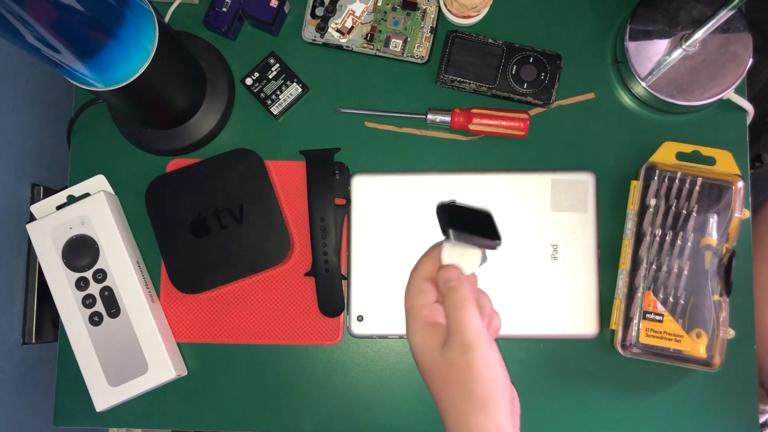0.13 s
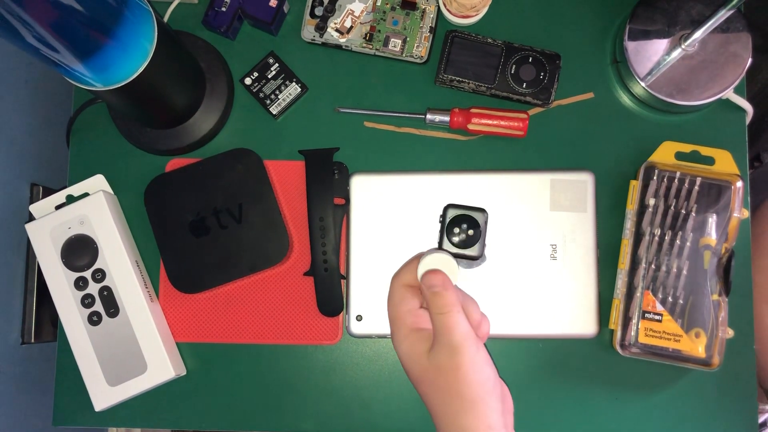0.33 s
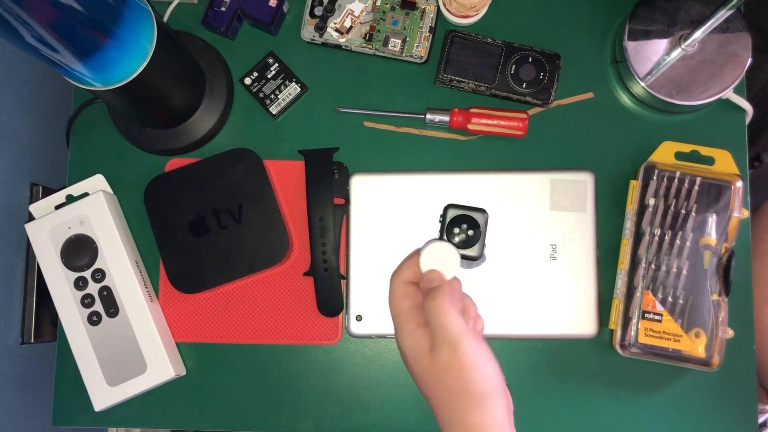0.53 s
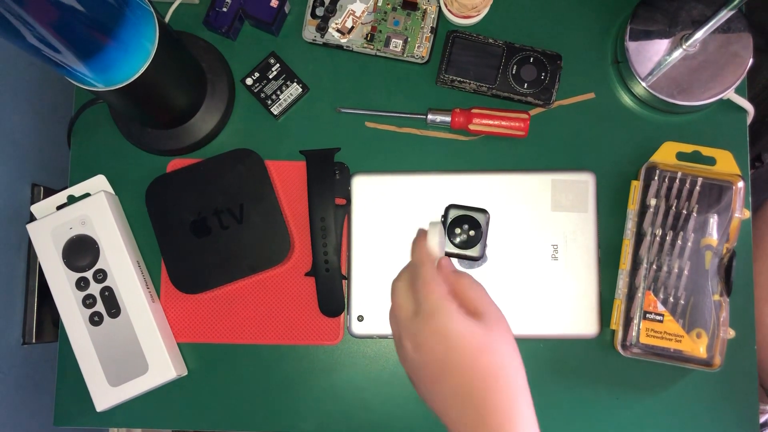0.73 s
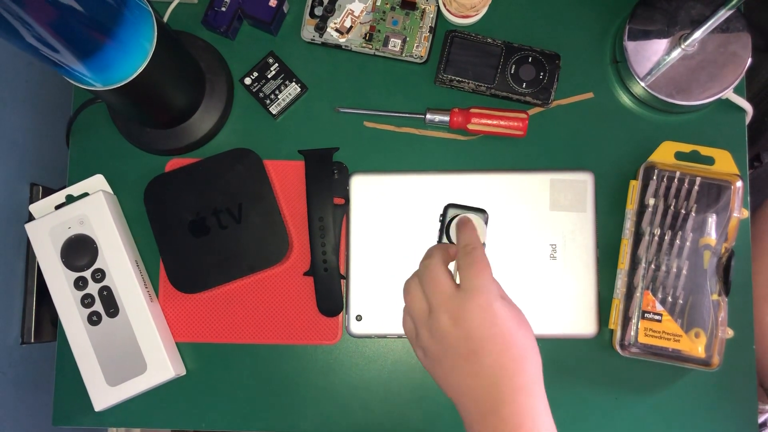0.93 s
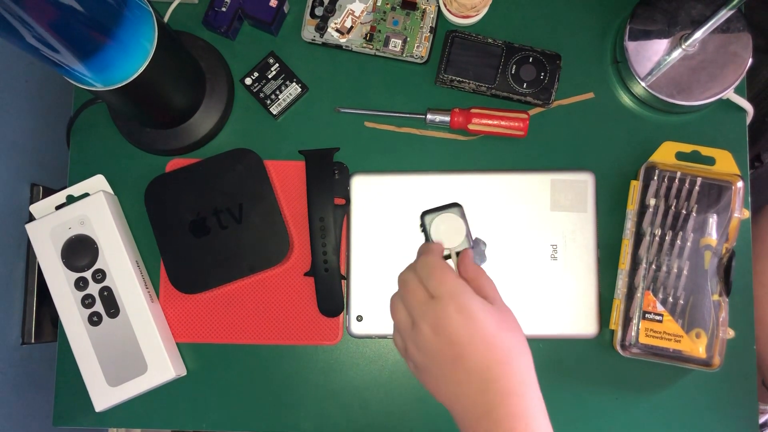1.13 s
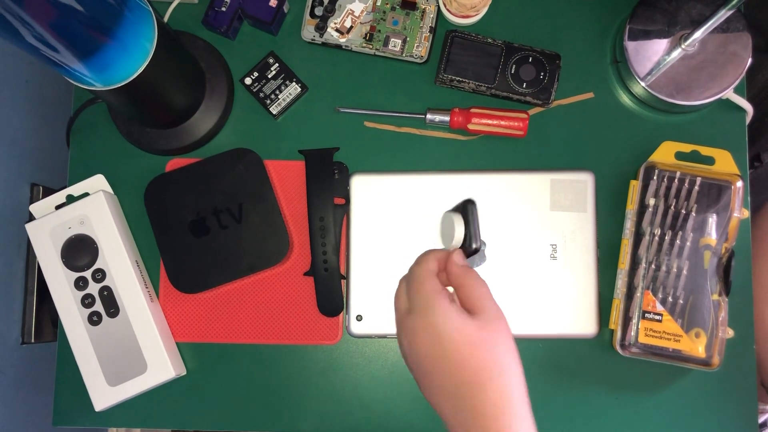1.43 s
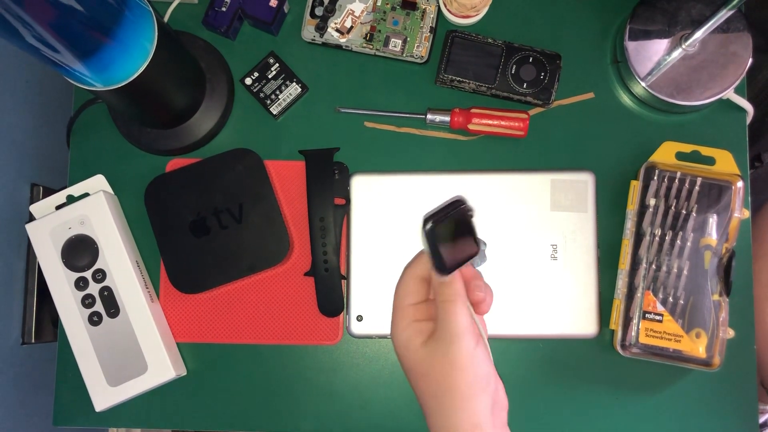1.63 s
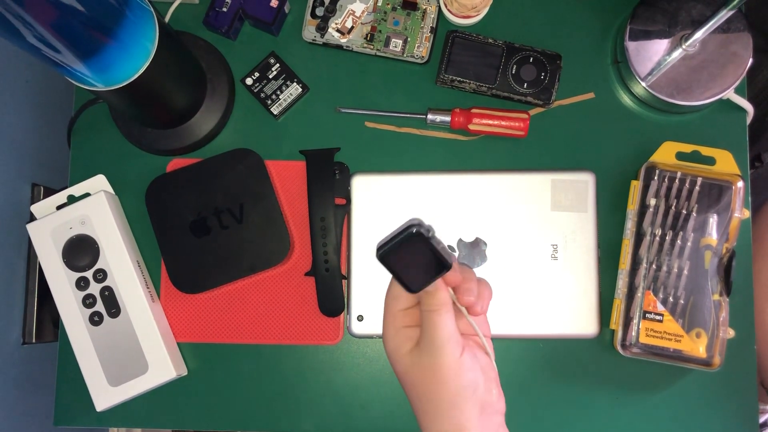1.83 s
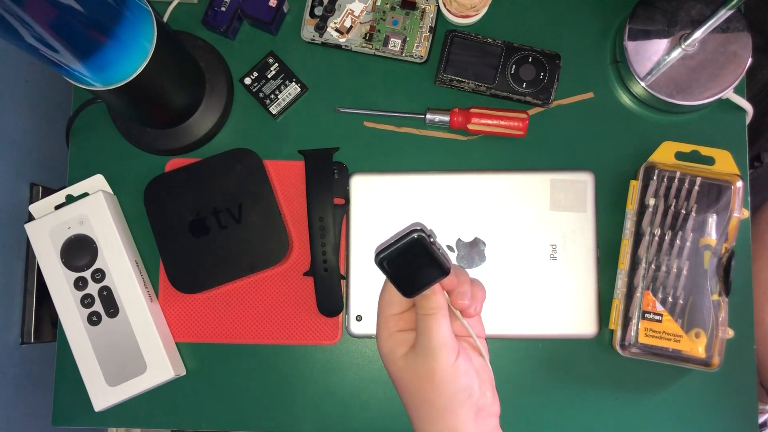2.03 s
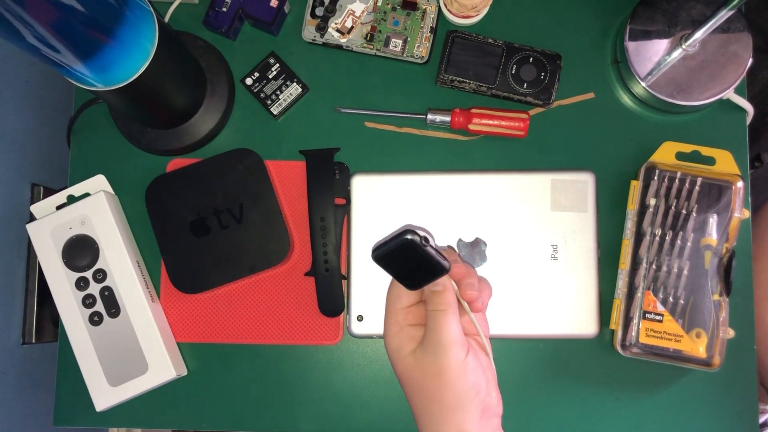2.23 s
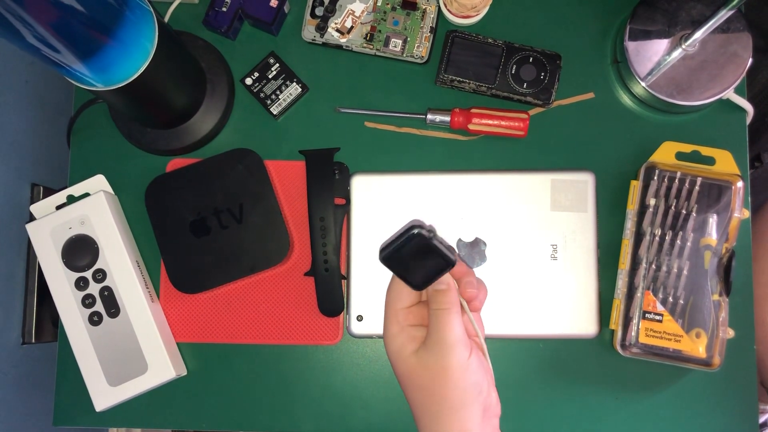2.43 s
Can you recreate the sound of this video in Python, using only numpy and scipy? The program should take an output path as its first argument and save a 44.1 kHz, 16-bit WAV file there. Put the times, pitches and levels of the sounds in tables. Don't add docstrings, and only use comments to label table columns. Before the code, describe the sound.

A small watch case clacks onto a thin slab on a desk: a loud, sharp edge hit at 0.22 seconds, a tiny bounce, then a flat slap at 0.30 with a short woody, rattly ring. After quiet hiss, a magnetic puck touches faintly at 0.85 and snaps on softly at 0.93. Very faint finger ticks follow at 1.1, and a light scrape at 1.27. Close microphone, small furnished room.

```python
import sys
import numpy as np
from scipy import signal
from scipy.fft import rfft, irfft
from scipy.io import wavfile

SR = 44100
rng = np.random.default_rng(int(sys.argv[2]) if len(sys.argv) > 2 else 0)


def volts_from_decibels(level):
    exponent = np.asarray(level, float) / 20
    return 10 ** exponent


def waveform_to_disk(signal):
    frames = np.transpose(np.atleast_2d(signal))
    scaled = np.clip(frames, -1, 1) * 32767
    samples = np.round(scaled).astype(np.int16)
    wavfile.write(sys.argv[1], SR, samples)


N = 114660
T = np.arange(N) / SR
LN1000 = np.log(1000)

# (frequency [Hz], level [dB per Hz])
HISS_SPECTRUM = [(6, -6.5), (16, 2), (40, -11), (70, -12.5), (200, -14), (600, -18.5), (4000, -26),
                 (15800, -29.5)]
HISS_DB = -69.5
MIC_LOW_HZ, TOP_HZ = 110.1, 15700

# (centre frequency [Hz], level [dB])
ROOM_BANDS = [(200, -17), (500, -18), (1200, -12.5), (3000, -15.5), (6000, -11.5), (9500, -10),
              (13500, -15)]
ROOM_BAND_T60 = [.22, .2, .2, .2, .19, .17, .16]
ROOM_BUILD_S = 0.01105
CLUTTER_DB, CLUTTER_T60_S = -9, 0.022
WALL_S, WALL_DB, WALL_SMEAR_S = 0.0075, -13.5, 0.01173
SCATTER_LOW_HZ = 1270

# (frequency [Hz], level [dB])
SCRAPE_SPECTRUM = [(800, 2.5), (2600, 1.5), (3400, 2.5), (4150, 1), (5200, 0), (6000, 2.5), (9000, -8.5),
                   (15000, -14)]
SCRAPE_S, SCRAPE_PEAK_S, SCRAPE_END_S, SCRAPE_DB = 1.268, 1.275, 1.308, -54

# (time [s], level [dB], push length [s])
EDGE_PUSHES = [
    (.2176, -23.5, 0.00027),
    (.2465, -31.5, 0.0005),
]
FLAT_PUSHES = [
    (.3003, -28, 0.00037),
    (.3245, -36, 0.00058),
]
TOUCH_PUSHES = [
    (.8456, -40, 0.00043),
    (.8655, -52, 0.00048),
    (.8775, -53.5, 0.00057),
]
SNAP_PUSHES = [
    (.9322, -41.5, 0.0002),
]
FINGER_PUSHES = [
    (1.1055, -57, 0.0012),
    (1.1115, -52, 0.0013),
    (1.1160, -53, 0.0019),
    (1.1265, -71, 0.0011),
    (1.2700, -53, 0.00099),
    (1.2850, -56.5, 0.00044),
]

# (frequency [Hz], level [dB], t60 [s])
EDGE_RING = [(136.6, -9.5, 0.13), (205, -6.5, 0.0698), (273, 0, 0.11), (331, -2.5, 0.09), (454, -5, 0.082),
             (574.7, -25, 0.048), (683, -2, 0.046), (763, -4, 0.054), (937, -1, 0.043), (1105, -2, 0.032),
             (1280, -3.5, 0.031), (1550, 1, 0.019), (1846, -4, 0.02)]
FLAT_RING = [(205, -15, 0.12), (275.8, -12, 0.14), (346.2, -1.5, 0.084), (459, -4.5, 0.078),
             (596, -11.5, 0.12), (704, -13, 0.037), (756, -4.5, 0.071), (903, -10, 0.055),
             (1096, -12.5, 0.11), (1310, -8, 0.073), (1580, -27, 0.093), (2185, 1, 0.059), (3288, 14, 0.08)]
TOUCH_RING = [(124.5, -10.5, 0.11), (210, -7.5, 0.083), (272.5, -5.5, 0.06), (335, 1, 0.073),
              (434, -3.5, 0.039), (570, -3, 0.046), (696, -9, .04), (762, -5.5, 0.057), (840, -3.5, 0.027),
              (1110, -3.5, 0.016)]
SNAP_RING = [(198, -2, 0.087), (274.8, 1, 0.15), (326, 2.5, 0.045), (466, -8.5, 0.056), (556, -8, 0.04),
             (720, -2, 0.033), (770, -1.5, 0.052), (895, -1.5, 0.036), (1046, -14, 0.022),
             (1423, -6.5, 0.058)]
FINGER_RING = [(289, 0.5, 0.045), (345, -3.5, 0.042), (770, -19, 0.05), (1200, -21, .03)]
SWELL_CYCLES = 0.51

# (level [dB], t60 [s])
SLAB_RATTLE = [
    (-3.5, 0.15),
    (-4.5, 0.18),
    (-0.5, 0.061),
    (-1, 0.13),
    (-11, 0.15),
]
# (frequency [Hz], level [dB])
RATTLE_SPECTRUM = [(120, -18.5), (300, -0.5), (600, 6.5), (1200, -2), (2500, -3.5), (5000, -7)]

# (time [s], click
# level [dB], click frequency [Hz], t60 [s], bright tick level [dB])
FALL_CONTACTS = [(.21700, -11.5, 3000, .0012, -34.5), (.21712, 0.5, 4300, .0024, -26),
                 (.21775, -11.5, 3300, 0.0045, -31.5), (.21838, -2, 3005, 0.0012, -20.5),
                 (.2189, -15, 6100, .003, -20.5), (.2197, -18, 2300, 0.003, -21),
                 (.2204, -21.5, 4400, .003, -26), (.2260, -23.5, 3280, 0.009, -31.5),
                 (.2272, -30, 5750, .005, -30), (.2352, -33.5, 7400, .003, -43.5),
                 (.2375, -28.5, 3900, .004, -46), (.2462, -21, 5700, .004, -40),
                 (.2466, -22.5, 2300, .004, -39.5), (.2478, -23, 2200, 0.006, -30),
                 (.2482, -26.5, 6600, .003, -34.5), (.2495, -28, 3480, 0.005, -42.5)]
FLAT_CONTACTS = [(0.2999, -3.5, 4640, .0022, -41), (0.3006, -5.5, 2230, 0.002, -34.5),
                 (0.3005, -10, 6040, 0.003, -27), (0.3010, -11.5, 11420, 0.0027, -16.5),
                 (0.3005, -18.5, 14700, .003, -32), (0.3019, -16.5, 3300, 0.0069, -21),
                 (0.3033, -15.5, 5350, .003, -25), (0.3032, -19.5, 4600, .003, -32.5),
                 (0.3059, -22.5, 4200, 0.0021, -33.5), (0.3076, -22, 5730, 0.004, -30),
                 (0.312, -29, 5840, .009, -33.5), (0.3187, -32, 5600, .004, -39),
                 (0.323, -29, 4180, 0.005, -36), (0.3257, -35, 5560, .004, -43),
                 (0.3367, -31, 3500, 0.002, -47.5)]
TOUCH_CONTACTS = [(0.8451, -32, 5610, 0.006, -61), (.8456, -43, 5660, 0.0044, -55),
                  (.8464, -41.5, 4800, 0.0086, -59), (0.8473, -32.5, 5860, 0.0028, -65),
                  (0.847, -46, 3930, 0.0072, -66), (0.849, -43, 2560, 0.0049, -57),
                  (0.8516, -52, 6050, 0.0039, -66)]
SNAP_CONTACTS = [(0.9303, -64, 2600, 0.0026, -69), (0.9316, -35, 3750, 0.0024, -61),
                 (.9318, -37, 5120, 0.0056, -64), (.9318, -51, 12000, 0.014, -69),
                 (0.9323, -30.5, 2400, 0.0028, -62), (.9326, -36.5, 3650, 0.011, -60),
                 (0.935, -47, 3160, 0.0035, -63), (0.9319, -43.5, 6900, 0.0052, -71),
                 (0.9327, -27.5, 1750, 0.0055, -56), (0.933, -52, 8700, 0.0057, -67),
                 (0.9338, -35.5, 2530, 0.0083, -58), (.9352, -46, 5050, .004, -64),
                 (.9410, -50, 3480, 0.0095, -51)]
LIFT_CONTACTS = [(1.1002, -52, 4200, 0.0057, -82), (1.1037, -56, 4704, 0.006, -78),
                 (1.1048, -53, 6560, 0.0046, -79), (1.1336, -54, 4800, 0.0038, -60),
                 (1.2320, -52, 4670, 0.005, -69), (1.2345, -66, 11500, .008, -74),
                 (1.2566, -50, 4310, 0.0072, -78), (1.2675, -45, 4270, .009, -59),
                 (1.2697, -41, 4000, 0.012, -52), (1.2707, -41, 4400, 0.0065, -55),
                 (1.2707, -48, 2550, 0.016, -78), (1.2748, -43.5, 4140, 0.009, -65),
                 (1.277, -46, 4430, 0.009, -61), (1.2790, -50, 4150, 0.0078, -59),
                 (1.2790, -54, 5900, 0.017, -66), (1.2805, -50, 2600, .012, -60),
                 (1.2822, -44, 4010, 0.018, -68), (1.2850, -50, 5800, 0.0075, -66),
                 (1.2898, -48, 5900, 0.0089, -54), (1.2918, -47, 4500, 0.01, -66),
                 (1.2950, -58, 4100, .012, -62), (1.2985, -52, 4860, 0.0091, -71),
                 (1.3040, -62, 4140, 0.0092, -70)]
# (frequency [Hz], level [dB])
TICK_SPECTRUM = [(1000, -12), (4000, -2), (6500, -4), (9000, -11), (11600, -2), (13300, -4), (15000, 0),
                 (15800, -6)]
HARD_RISE_S, SOFT_RISE_S = 0.0001, 0.00053
TICK_S = 0.00083


def colour(x, points):
    curve = np.array(points)
    hz = np.maximum(np.arange(len(x) // 2 + 1) * SR / len(x), 1)
    gain_db = np.interp(np.log(hz), np.log(curve[:, 0]), curve[:, 1])
    return irfft(rfft(x) * volts_from_decibels(gain_db), len(x))


def fade(t, t60):
    return (t >= 0) * np.exp(-LN1000 * np.maximum(t, 0) / t60)


def highpass(x, order, hz):
    return signal.sosfilt(signal.butter(order, hz, "highpass", fs=SR, output="sos"), x)


def hiss():
    noise = colour(rng.standard_normal(N), HISS_SPECTRUM)
    return noise * volts_from_decibels(HISS_DB) / np.std(highpass(noise, 2, 100))


def unit_energy(x):
    return x / np.sqrt(np.sum(x ** 2))


def room():
    t = T[:SR // 2]
    noise = rng.standard_normal((len(ROOM_BANDS) + 2, len(t)))
    clutter = volts_from_decibels(CLUTTER_DB) * unit_energy(noise[0] * fade(t - 0.0008, CLUTTER_T60_S))
    wall = volts_from_decibels(WALL_DB) * unit_energy(noise[1] * fade(t - WALL_S, WALL_SMEAR_S))
    response = highpass(clutter + wall, 1, SCATTER_LOW_HZ)
    build = 1 - np.exp(-t / ROOM_BUILD_S)
    for (hz, db), t60, band_noise in zip(ROOM_BANDS, ROOM_BAND_T60, noise[2:]):
        edges = [hz / 1.482, min(hz * 1.6, 20000)]
        bandpass = signal.butter(2, edges, "bandpass", fs=SR, output="sos")
        tail = signal.sosfilt(bandpass, band_noise) * fade(t, t60) * build
        response += volts_from_decibels(db) * tail * np.sqrt(1000 / SR / t60 / 10) / 2
    response[0] += 1
    return response


def scrape():
    envelope = np.interp(T, [SCRAPE_S, SCRAPE_PEAK_S, SCRAPE_END_S], [0, 1, 0])
    grain_db = 3 * np.repeat(rng.standard_normal(N // 40 + 1), 40)[:N]
    grains = rng.standard_normal(N) * volts_from_decibels(grain_db)
    return volts_from_decibels(SCRAPE_DB) * colour(grains * envelope, SCRAPE_SPECTRUM)


def slab(pushes, modes, rattle):
    push = np.zeros(N)
    for s, db, length in pushes:
        phase = np.clip((T - s) / length, 0, 1)
        push += volts_from_decibels(db) * np.sin(np.pi * phase) / (length * SR) * np.pi / 2
    t = T[:SR // 2]
    ring = np.zeros(len(t))
    for k, (hz, db, t60) in enumerate(modes):
        swell = 1 - np.exp(-t * hz / SWELL_CYCLES)
        sign = (-1) ** k
        ring += sign * volts_from_decibels(db) * np.sin(2 * np.pi * hz * t) * fade(t, t60) * swell
    rattle_db, rattle_t60 = rattle
    dense = colour(rng.standard_normal(len(t)), RATTLE_SPECTRUM)
    ring += volts_from_decibels(rattle_db) * dense / np.std(dense) * fade(t, rattle_t60)
    return signal.fftconvolve(push, ring)[:N]


def clicks(contacts, noise, rise_s):
    out = np.zeros(N)
    for s, db, hz, t60, tick_db in contacts:
        start = int(s * SR)
        cut = slice(start, start + SR // 20)
        t = np.maximum(T[cut] - s, 0)
        rise = 1 - np.exp(-t / rise_s)
        ring = -np.sin(2 * np.pi * hz * t) * fade(t, t60) * rise
        tick = noise[cut] * np.exp(-t / TICK_S) * (t > 0)
        out[cut] += volts_from_decibels(db) * ring + volts_from_decibels(tick_db) * tick
    return out


def scene():
    tick = colour(rng.standard_normal(N), TICK_SPECTRUM)
    tick = tick / np.std(tick)
    falling = [FALL_CONTACTS, FLAT_CONTACTS, TOUCH_CONTACTS, SNAP_CONTACTS]
    case = [clicks(contacts, tick, HARD_RISE_S) for contacts in falling]
    case.append(clicks(LIFT_CONTACTS, tick, SOFT_RISE_S) + scrape())
    pushes = [EDGE_PUSHES, FLAT_PUSHES, TOUCH_PUSHES, SNAP_PUSHES, FINGER_PUSHES]
    modes = [EDGE_RING, FLAT_RING, TOUCH_RING, SNAP_RING, FINGER_RING]
    heard = np.zeros(N)
    for case_sound, push, ring, rattle in zip(case, pushes, modes, SLAB_RATTLE):
        source = case_sound + slab(push, ring, rattle)
        heard += signal.fftconvolve(source, room())[:N]
    return (highpass(heard, 5, MIC_LOW_HZ) + hiss())[None]


def roll_off(x):
    return signal.sosfilt(signal.butter(12, 16870, fs=SR, output="sos"), x)


def record(dry):
    top_cut = signal.ellip(10, 0.2, 47, TOP_HZ, fs=SR, output="sos")
    mix = signal.sosfilt(top_cut, dry)
    return roll_off(mix)


dry = scene()
out = record(dry)
waveform_to_disk(out)
```